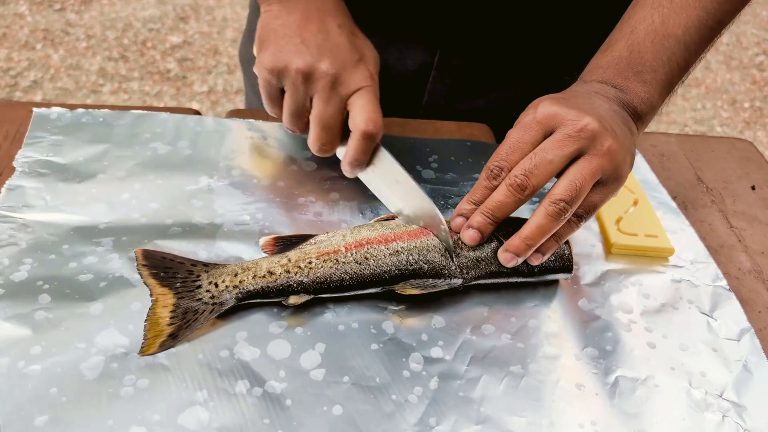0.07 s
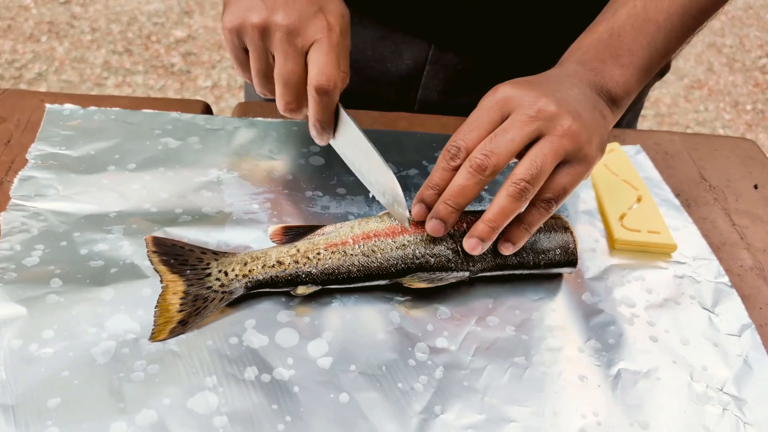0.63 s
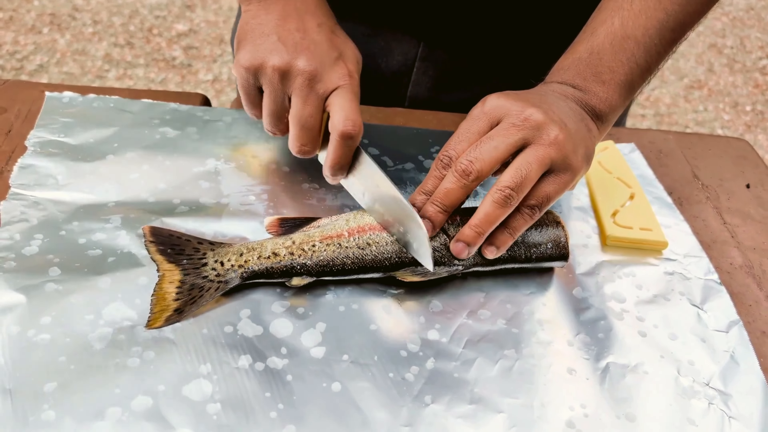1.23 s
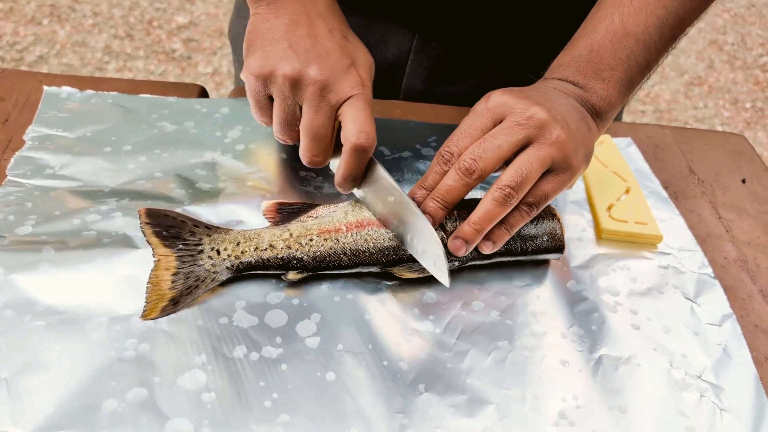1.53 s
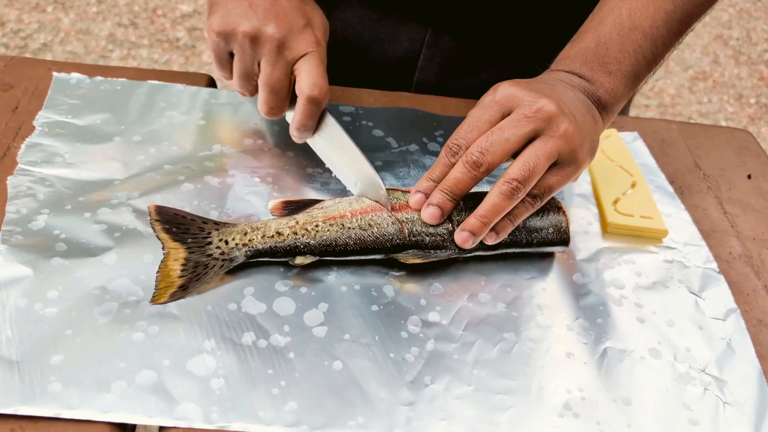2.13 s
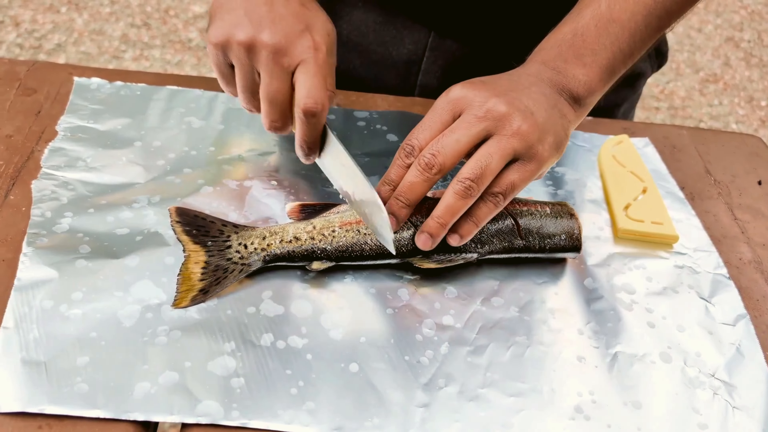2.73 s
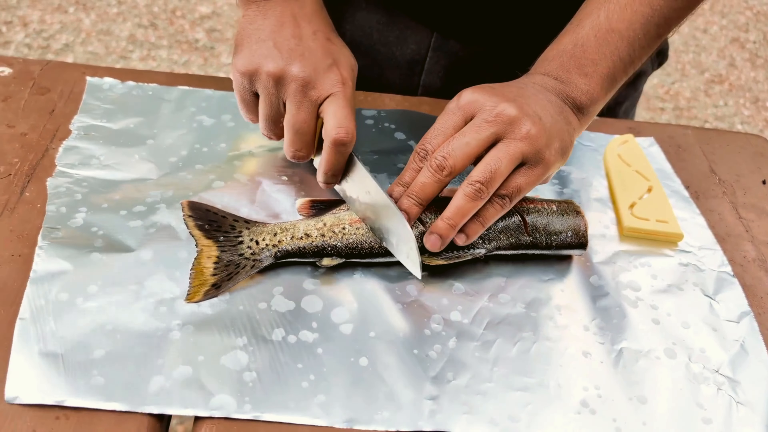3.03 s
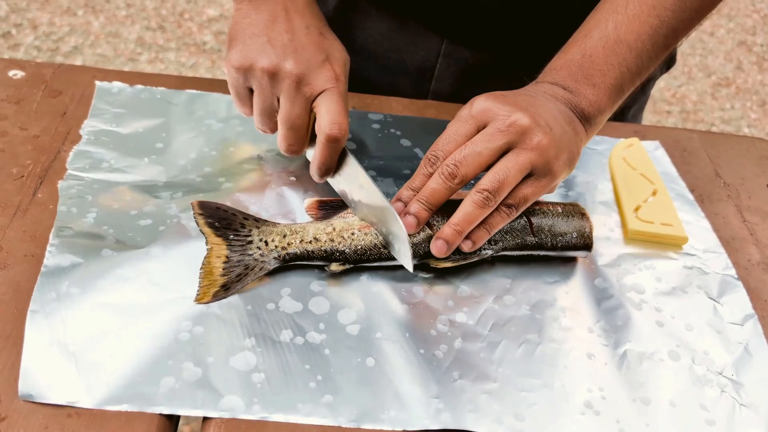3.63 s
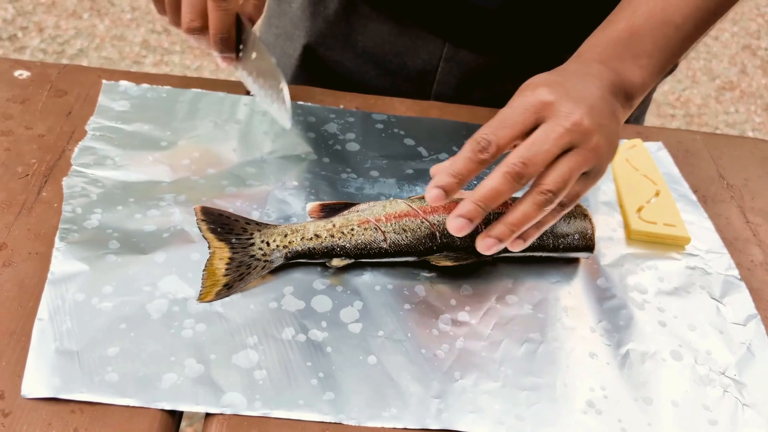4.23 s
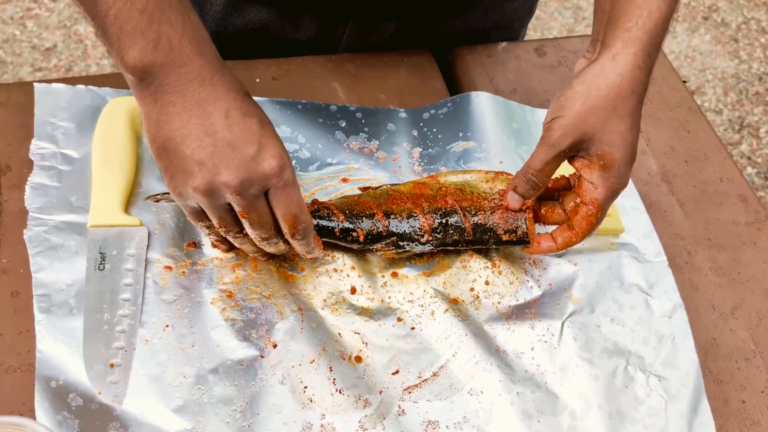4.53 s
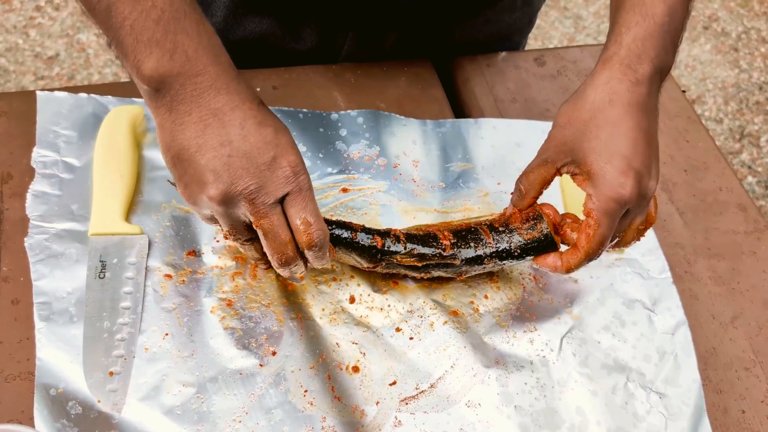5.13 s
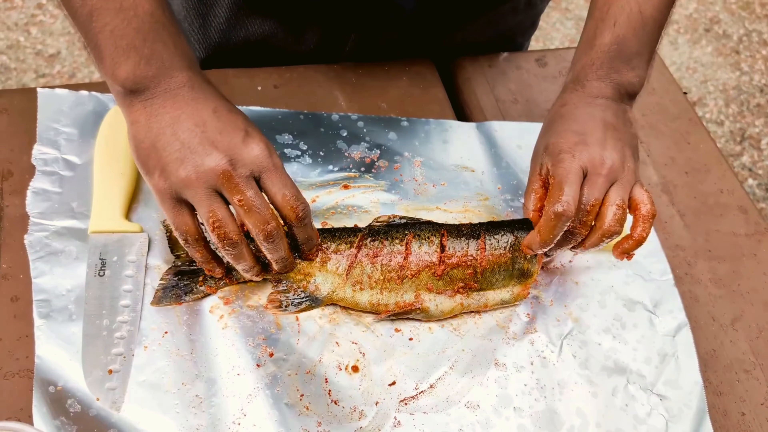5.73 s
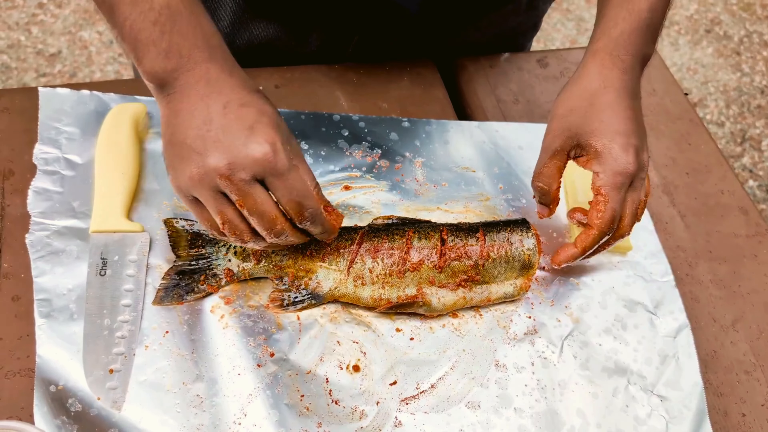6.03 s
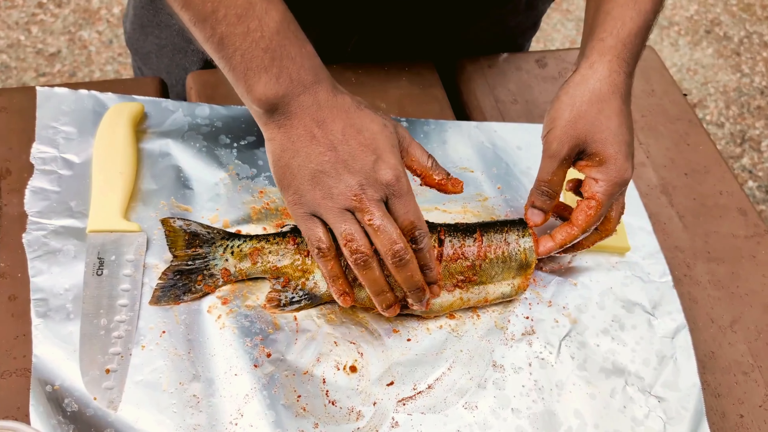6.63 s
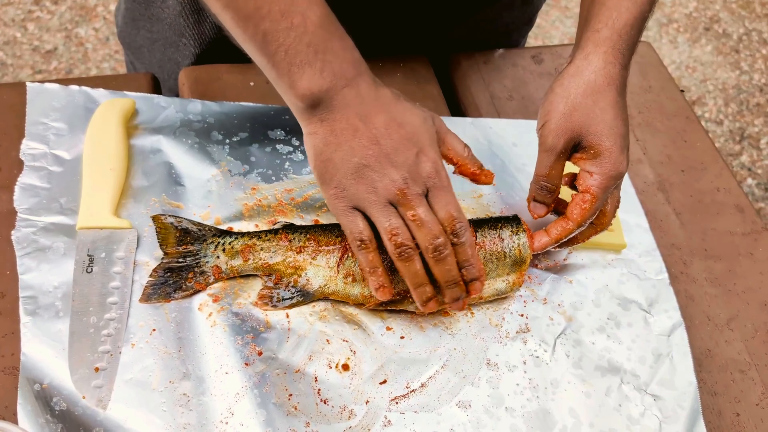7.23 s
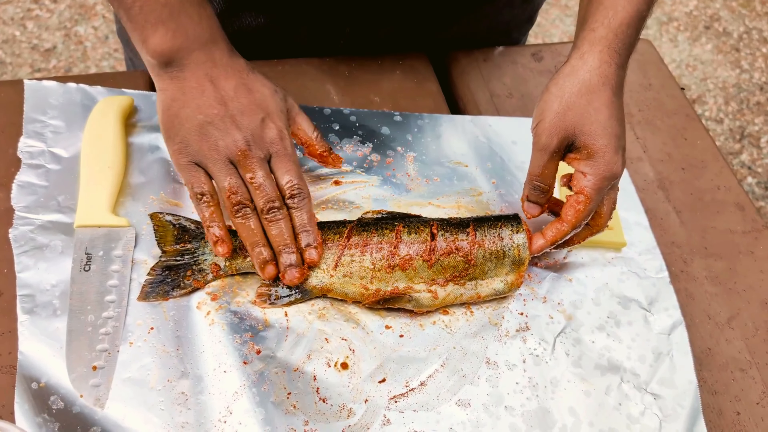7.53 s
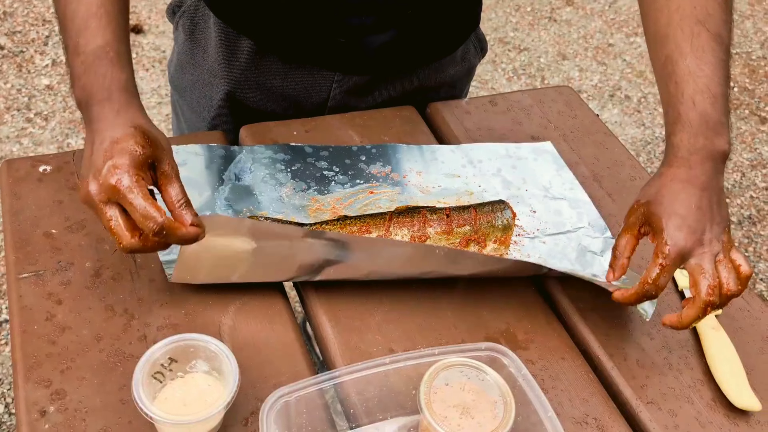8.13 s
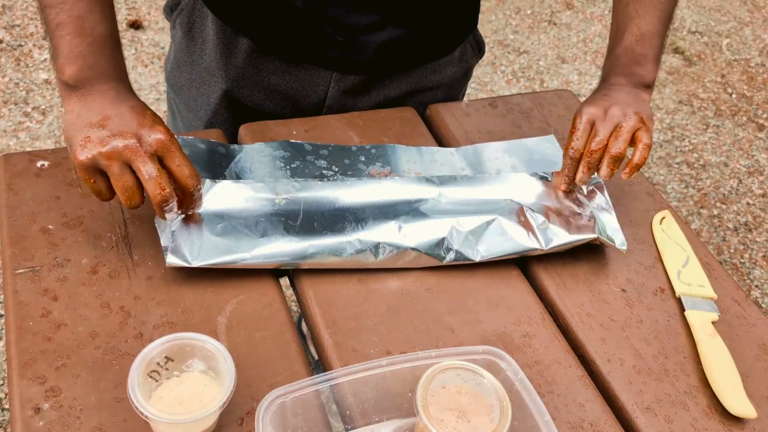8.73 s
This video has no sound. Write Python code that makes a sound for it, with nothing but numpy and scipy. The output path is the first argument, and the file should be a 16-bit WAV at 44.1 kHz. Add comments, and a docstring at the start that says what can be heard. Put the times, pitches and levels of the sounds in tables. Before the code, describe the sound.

In a forest clearing, distant birds chirp, buzz and trill with a light echo as burning wood crackles near the microphone. After one very loud pop from the fire, aluminium foil starts to crinkle and rustle close by, with a few soft knocks. The handling thins to scattered snaps, the fire pops sharply again, and the folding picks up, all over a soft low rumble of flames and breeze.

```python
"""In a forest clearing, aluminium foil is pressed and folded beside a campfire.
The foil crinkles as its facets buckle and ring, and larger creases snap through. Steam bursts
from the wood in pops, one very loud, and dry splinters tick over a low flutter of flames and
breeze; a few dull knocks sound. Distant songbirds whistle frequency-modulated buzzes, sweeps
and trills, which the trees scatter into reverberation."""
import sys
import numpy as np
from scipy import signal
from scipy.fft import rfft, irfft
from scipy.io import wavfile
from scipy.ndimage import uniform_filter1d, map_coordinates

SR = 44100
rng = np.random.default_rng(int(sys.argv[2]) if len(sys.argv) > 2 else 0)


def wav_out(sig):
    """Save sig, one row per channel (or a flat mono array), as 16-bit PCM at SR to the path in sys.argv[1]."""
    wavfile.write(sys.argv[1], SR, np.round(np.clip(np.atleast_2d(sig).T, -1, 1) * 32767).astype(np.int16))


N = 395577


def gain_of(db):
    """Amplitude ratio of a level in decibels."""
    return 10 ** (np.asarray(db) / 20)


def unit_rms(x):
    """Normalisation to unit mean power."""
    return x / np.sqrt(np.mean(x ** 2) + 1e-20)


def at_frequency(points, hz):
    """Interpolation on a logarithmic frequency axis."""
    point_hz, value = np.transpose(points)
    return np.interp(np.log(hz + 1), np.log(point_hz + 1), value)


def envelope(points):
    """Linear interpolation in time, one value a sample."""
    return np.interp(np.arange(N) / SR, *np.transpose(points))


def colour(x, spectrum):
    """Spectral shaping by a minimum-phase filter of unit energy."""
    log_gain = np.log(gain_of(at_frequency(spectrum, abs(np.fft.fftfreq(8192, 1 / SR)))))
    taps = np.fft.ifft(np.exp(np.conj(signal.hilbert(log_gain)))).real[:4096]
    return signal.oaconvolve(x, taps[None] / np.linalg.norm(taps), axes=1)[:, :x.shape[1]]


def resonate(x, hz, q):
    """Second-order resonance with unit gain at its peak."""
    return signal.lfilter(*signal.iirpeak(hz, q, fs=SR), x)


def noise_pair(size, coherence):
    """Partially coherent white noise in two channels."""
    a, b = rng.standard_normal((2, size))
    return np.array([a, coherence * a + np.sqrt(1 - coherence ** 2) * b])


def wander(size, per_s):
    """Smooth random modulation of rms about 1."""
    steps = np.arange(size) * per_s / SR
    return map_coordinates(rng.standard_normal(4096), [steps], order=3, mode="wrap")


def panned(side_db):
    """Channel gains for an interaural level difference, left minus right."""
    return gain_of([[side_db / 2], [-side_db / 2]])


def add(mix, start_s, sound):
    """Superposition of a sound on the mix."""
    part = mix[:, max(round(start_s * SR), 0):][:, :sound.shape[-1]]
    part += sound[..., :part.shape[1]]


def burst(decay_s, coherence, rise_s=0.00022):
    """Dense damped modes, modelled as exponentially decaying noise."""
    t = np.arange(SR // 8) / SR
    return .5 * noise_pair(len(t), coherence) * np.exp(-t / decay_s) * (1 - np.exp(-t / rise_s))


def flames_and_breeze():
    """Amplitude-modulated noise gives a low flutter and a flaring roar; steady noise, a faint hiss."""
    # likeness of the two channels: frequency_hz, coherence
    likeness = [(60, 0.65), (400, 0.92), (3000, 0.63), (10000, 0.98)]
    # low flutter of flames and breeze: time_s, level_db
    rumble_levels = [(0.0, -46), (0.82, -42), (.93, -36.5), (1.04, -42), (7.1, -42), (7.35, -37.5),
                     (7.5, -41.5), (8.97, -43)]
    # its spectrum: frequency_hz, relative_db
    rumble_spectrum = [(20, 1.5), (115, -0.5), (180, -7), (260, -16.5), (450, -26.5), (1500, -74)]
    # flames flaring up: time_s, level_db
    flare_levels = [(0, -102), (.9, -60), (2.05, -53), (2.3, -83), (2.9, -52.5), (3.6, -74.5), (7, -63)]
    # hiss of embers and forest: frequency_hz, relative_db
    hiss_spectrum = [(200, -1.5), (500, 2.5), (1000, -4), (2000, -12), (6300, -11), (7100, 0.5),
                     (8000, -11), (10500, 4), (11300, -24), (14000, -86)]
    coherence = at_frequency(likeness, np.fft.rfftfreq(N, 1 / SR))
    a, b = rfft(rng.standard_normal((2, N)))
    noise = irfft(np.array([a, coherence * a + np.sqrt(1 - coherence ** 2) * b]), N)
    rumble = unit_rms(colour(noise, rumble_spectrum))
    rumble *= gain_of(envelope(rumble_levels) + 2.56 * wander(N, 22))
    roar_band = signal.butter(2, [160, 400], "band", fs=SR, output="sos")
    roar = unit_rms(signal.sosfilt(roar_band, noise_pair(N, 0.86)))
    roar *= gain_of(envelope(flare_levels) + 2.5 * wander(N, 30))
    hiss = unit_rms(colour(noise[:, ::-1], hiss_spectrum)) * gain_of(-58)
    return rumble + roar + hiss


def forest(x, t60_s, early_db):
    """Reverberation: early reflections from the ground and near trunks, then a scattered tail."""
    t = np.arange(SR) / SR
    echoes = rng.choice([-1., 1.], (2, SR)) * (rng.random((2, SR)) < 2000 / SR) * (t > .003)
    echoes *= gain_of(-60 * t / t60_s) + gain_of(early_db) * np.exp(-t / 0.015)
    return signal.oaconvolve(x, echoes / np.linalg.norm(echoes[0]), axes=1)[:, :N]


def syllable(name, pitch_ratio, flutter_hz=115, waver_hz=38, accent_db=3):
    """Frequency modulation: an unevenly accented whistle glides, wavers and may flutter fast."""
    # whistle contours by syllable: time_s, pitch_hz, level_db
    contours = { "rise": [(0, 4480, -20), (.028, 4500, -2), (.044, 4700, -4), (.076, 6000, -2)],
                "seep": [(0, 6840, -3), (.085, 6640, -6)], "flick": [(0, 5600, -6), (.012, 4750, 0),
                (.03, 4150, -3)], "drop": [(0, 6050, -7), (.009, 5500, 3), (.024, 4650, -3),
                (.04, 3950, -6), (.06, 3850, -10)], "sweep": [(0, 4800, -22), (.016, 5200, -12.5),
                (.036, 6500, -18), (.066, 7250, -1), (.1, 7500, 2), (.135, 7420, -14)],
                "high": [(0, 4870, 9.5), (.02, 5600, 0.5), (.045, 7600, 0), (.085, 8450, 7),
                (.12, 7890, -1)], "buzz": [(0, 6360, -4), (.035, 6820, 2.5), (.055, 6650, 14.5),
                (.1, 6240, -21)], "slur": [(0, 5856, 0.5), (.09, 5410, -8.5), (.125, 5290, -38)],
                "thin": [(0, 7220, 3.5), (.12, 7170, 16), (.17, 7216, -3)], "chip": [(0, 5100, 3),
                (.022, 4650, -5)], "carol": [(0, 3035, 5.5), (.05, 2688, -0.5)], "warble": [(0, 2500, -12),
                (.028, 2850, -4), (.046, 2400, 2), (.055, 2850, -7), (.07, 2480, 1), (.082, 2480, 3),
                (.106, 2030, -1)]}
    # fast pitch swing by syllable: deviation_hz
    flutter_depths = {"buzz": 260, "sweep": 150, "high": 210, "carol": 130}
    time_s, hz, db = np.transpose(contours[name])
    t = np.arange(0, time_s[-1], 1 / SR)
    detuning = 1 + .003 * rng.standard_normal()
    pitch = pitch_ratio * detuning * np.interp(t, time_s, hz) + waver_hz * wander(len(t), 293)
    pitch += flutter_depths.get(name, 0) * np.sin(2 * np.pi * flutter_hz * t)
    accents = unit_rms(gain_of(accent_db * wander(len(t), 130)))
    amplitude = gain_of(np.interp(t, time_s, db)) * accents * signal.windows.tukey(len(t), .15)
    return np.sqrt(2) * np.sin(2 * np.pi * np.cumsum(pitch) / SR) * amplitude


def birds():
    """Notes and trills take two paths: direct to the ears, and out to the trees that scatter them."""
    # single notes: start_s, syllable, pitch_ratio, level_db, side_db
    single_notes = [(0.417, "rise", 1, -46, 0), (0.619, "rise", .995, -36, -0.5),
                    (3.112, "sweep", 1.02, -33, 1), (5.245, "carol", 0.77, -43.5, 2),
                    (7.818, "warble", 1, -36.5, 8), (7.935, "carol", 1.27, -51, -7),
                    (8.175, "thin", 1.165, -57, 10), (8.254, "carol", 0.96, -48, 14),
                    (8.442, "carol", 0.9, -45.5, 6.5), (0.826, "seep", 1, -38, 4),
                    (2.075, "flick", 1.02, -48, -2.5), (2.336, "buzz", 1.005, -39.5, 2.5),
                    (3.31, "slur", 0.985, -27, -3), (4.081, "thin", 1, -55.5, -8),
                    (4.658, "carol", 0.95, -43, 4), (7.04, "slur", 1.025, -30.5, -4),
                    (7.635, "thin", 1.005, -53, -3), (7.668, "carol", 0.98, -47.5, 14.5)]
    # repeated notes: first_s, last_s, interval_s, syllable, pitch_ratio, first_db, last_db, side_db
    trills = [(0.936, 1.774, .1197, "drop", 1.015, -44.5, -39.5, -5),
              (2.458, 2.885, .214, "sweep", 1, -30.5, -31.5, 1),
              (3.446, 3.958, .0637, "flick", 1.01, -51, -53.5, -3.5),
              (4.461, 4.974, .129, "chip", .99, -32, -34, -2.5),
              (6.158, 6.827, .224, "high", 1, -49.5, -50, -1)]
    # sound reaching the trees, by syllable: relative_db
    echo_levels = {"chip": -6, "high": 5, "flick": 6, "sweep": 2, "drop": 2, "carol": 3}
    direct, scattered = np.zeros((2, 2, N))
    notes = list(single_notes)
    for first_s, last_s, interval_s, name, pitch_ratio, first_db, last_db, side_db in trills:
        count = round((last_s - first_s) / interval_s) + 1
        for start_s, db in np.linspace((first_s, first_db), (last_s, last_db), count):
            notes.append((start_s, name, pitch_ratio, db, side_db))
    for start_s, name, pitch_ratio, db, side_db in notes:
        sound = gain_of(db) * panned(side_db) * syllable(name, pitch_ratio)
        lag = round(-3 * np.tanh(side_db / 2))  # the far ear hears the bird a few samples later
        add(direct, start_s, np.array([np.roll(sound[0], lag), sound[1]]))
        add(scattered, start_s, gain_of(echo_levels.get(name, 0)) * sound)
    return direct, scattered


def knocks():
    """Impulsive excitation: a scuff of noise drives a broad, steep-sided resonance."""
    # soft hollow knocks: start_s, ring_hz, peak_db
    taps = [(5.086, 1050, -24), (5.087, 2200, -22), (5.915, 260, -35), (5.99, 2000, -32),
            (6.919, 1700, -33), (6.94, 600, -36), (6.981, 1700, -36), (7.492, 450, -34)]
    out = np.zeros((2, N))
    for start_s, hz, db in taps:
        ring = resonate(resonate(burst(.005, coherence=.9), hz, q=2), hz, q=2)
        add(out, start_s, gain_of(db) * ring / abs(ring).max())
    return out


def burning_wood(puff_s=0.00028, faint_ticks_per_s=42):
    """Sudden pressure release: steam pockets burst with a puff and a crack; splinters tick between."""
    # bursting steam pockets: start_s, crack_db, decay_s, puff_db
    pops = [(0.0732, -13, 0.0016, -25.5), (0.264, -30, 0.0038, -15), (2.311, -24, 0.001, -29),
            (4.2595, 4.5, 0.0016, 6), (4.2613, 4.5, 0.0025, -20), (5.946, -14, 0.0026, -22),
            (7.035, -5.5, 0.00087, -33), (7.782, -3.5, 0.002, -1)]
    # dry splinters, without a puff: start_s, level_db, ring_hz
    ticks = [(.198, -25.5, 2020), (0.401, -23.5, 3530), (.708, -29.5, 2500), (.905, -11, 6050),
             (1.191, -33, 3000), (1.294, -21, 8200), (1.417, -26, 8000), (1.514, -31, 3000),
             (1.665, -25, 2450), (2.424, -19.5, 6100), (2.654, -27.5, 3060), (2.779, -21, 6200),
             (2.988, -19, 4040), (3.092, -19.5, 7000), (3.554, -23, 3000), (3.736, -32, 2500),
             (3.801, -18.5, 4140), (6.938, -20.5, 4960), (7.232, -26.5, 1960), (7.877, -7, 5900)]
    # splintering wood: frequency_hz, relative_db
    crack_spectrum = [(60, 23.5), (150, 14), (500, 8.5), (780, 5), (1050, 5.5), (2200, 6), (3200, 2.5),
                      (6000, 3.5), (10500, 5.5), (11300, -23), (14000, -114)]
    cracks, puffs = np.zeros((2, 2, N))
    u = np.arange(SR // 50) / SR / puff_s
    blast_wave = (1 - u) * np.exp(-u)  # compression, then rarefaction
    for start_s, crack_db, decay_s, puff_db in pops:
        # the weaker the puff, the thinner the splinter and the brighter its crack
        highpass = signal.butter(1, 130 * gain_of(-.5 * puff_db), "high", fs=SR)
        crack = signal.lfilter(*highpass, burst(decay_s, coherence=0.84, rise_s=0.000082))
        add(cracks, start_s, gain_of(crack_db) * crack)
        add(puffs, start_s, gain_of(puff_db) * blast_wave)
    for start_s, db, hz in ticks:
        add(cracks, start_s, gain_of(db) * resonate(burst(0.0018, coherence=0.78), hz, q=1))
    faint_db = -48 + 5 * np.minimum(rng.exponential(1, N), 2.8)
    impulses = gain_of(faint_db) * (rng.random(N) < faint_ticks_per_s / SR)
    cracks += signal.oaconvolve(impulses[None], burst(0.0012, coherence=0.43), axes=1)[:, :N]
    puffs = signal.sosfilt(signal.butter(6, 7000, fs=SR, output="sos"), puffs)
    return colour(cracks, crack_spectrum) + puffs


def press(start_s, length_s, attack_s=0.018, release_s=0.03):
    """Loading and relaxation: a finger's force builds, holds and dies away exponentially."""
    t = np.arange(N) / SR - start_s
    return np.clip(t / attack_s, 0, 1) * np.exp(-np.clip((t - length_s) / release_s, 0, 20))


def buckling(drive, onset_s, per_s, spread_db, decay_s, coherence, ring_db, band_hz, facets=24):
    """Facets buckle as a Poisson process, denser under force; each rings at its own frequency."""
    busy_db, least_share = -49, 0.25  # below this drive fewer facets buckle, down to this share
    t, out = np.arange(SR // 25) / SR, np.zeros((2, N))
    for hz in np.geomspace(*band_hz, facets):
        phase = rng.random((2, 1)) * (1 - coherence)
        ring = np.sin(2 * np.pi * (hz * t + phase)) * np.exp(-t / (2 * decay_s))
        click = burst(decay_s, coherence, rise_s=.0001)[:, :len(t)] + gain_of(ring_db) * ring
        click = unit_rms(click) / np.sqrt(t[-1] * per_s)
        gaps, sizes = rng.exponential(1, (2, 1024))
        times = onset_s + np.cumsum(gaps) * facets / per_s
        # the strain moves from facet to facet, so the colour keeps shifting
        strain_db = 3 * np.interp(times * 14, np.arange(256), rng.standard_normal(256))
        drive_now = drive[np.minimum((times * SR).astype(int), N - 1)]
        share = np.clip(drive_now / gain_of(busy_db), least_share, 1)
        strengths = unit_rms(gain_of(spread_db * np.minimum(sizes, 3.4) + strain_db))
        gains = strengths * drive_now / np.sqrt(share)
        buckles = (rng.random(len(times)) < share) & (times < N / SR)
        for start_s, gain in zip(times[buckles], gains[buckles]):
            add(out, start_s, gain * click)
    return out


def flexing(x, depth_db=3):
    """Bending shifts the sheet's resonances, so patches of the spectrum swell and sink."""
    spectra = signal.stft(x)[2]
    patches = uniform_filter1d(rng.standard_normal(spectra.shape[1:]), size=4, axis=0)
    patches = uniform_filter1d(patches, size=11)
    gains = unit_rms(gain_of(depth_db * unit_rms(patches)))
    return signal.istft(spectra * gains)[1][:, :N]


def foil(loose_crinkle_db=-9):
    """Elastic instability: pressing sets off fine crinkle and broader rustle; creases snap through."""
    # movement of the whole sheet: time_s, rustle_db
    handling = [(4.3, -45), (5.33, -46.5), (5.5, -70.5), (5.7, -42.5), (5.95, -52), (6.08, -65),
                (6.45, -56.5), (7.35, -57), (7.9, -50), (8.97, -42.5)]
    # fingers pressing in: start_s, length_s, crinkle_db, rustle_db
    presses = [(4.446, 0.14, -40, -47.5), (4.629, 0.031, -35, -43.5), (4.778, 0.027, -34.5, -43),
               (4.897, 0.014, -31.5, -49), (5.078, 0.023, -38.5, -40), (5.236, 0.062, -39, -43),
               (5.577, 0.077, -34, -41.5), (5.713, 0.039, -38, -48), (5.789, 0.18, -46, -47),
               (6.763, 0.046, -48.5, -50), (7.993, 0.14, -42.5, -47.5), (8.147, 0.12, -40.5, -47),
               (8.398, 0.037, -40, -47), (8.468, 0.079, -37.5, -44), (8.731, 0.094, -34.5, -38),
               (8.869, 0.042, -44, -33)]
    # single large creases: start_s, level_db, decay_s, ring_hz
    creases = [(4.995, -21, .004, 5000), (5.06, -25, 0.0026, 7000), (5.159, -24, 0.008, 7800),
               (5.328, -24.5, 0.0059, 4500), (5.564, -28, 0.0076, 12000), (5.598, -17.5, 0.036, 6460),
               (5.92, -24.5, 0.0041, 14000), (6.207, -20.5, 0.0066, 12000), (6.422, -10.5, 0.0067, 8600),
               (6.806, -17.5, 0.0051, 13400), (7.169, -30.5, 0.0036, 10900), (7.562, -13.5, 0.0021, 7600),
               (7.806, -11, .0079, 7500), (8.157, -26, .05, 8600), (8.312, -27, 0.017, 7400),
               (8.416, -18.5, 0.0075, 10000), (8.489, -19.5, 0.011, 9400), (8.599, -25.5, 0.012, 7000),
               (8.683, -23, 0.012, 4900), (8.746, -11.5, 0.0025, 10700), (8.795, -21.5, 0.028, 13500),
               (8.832, -11, .0022, 10000), (8.869, -20, .008, 11000), (8.894, -16, .017, 11800),
               (8.946, -14, 0.003, 9000)]
    # fine crinkle: frequency_hz, relative_db
    crinkle_spectrum = [(200, -33), (2500, -8), (4500, -5), (7000, -4), (10000, -3.5), (13000, -8),
                        (16000, -11)]
    # broader rustle: frequency_hz, relative_db
    rustle_spectrum = [(100, -17), (300, 2.5), (600, -2.5), (1400, -1), (2300, 5), (3500, 1), (6000, 5),
                       (10000, -4), (13000, -61)]
    sheet_db, onset_s = envelope(handling), handling[0][0]
    crinkle_power = gain_of(sheet_db + loose_crinkle_db) ** 2
    rustle_power = gain_of(sheet_db) ** 2
    for start_s, length_s, crinkle_db, rustle_db in presses:  # incoherent sources add in power
        force = press(start_s, length_s)
        crinkle_power += (gain_of(crinkle_db) * force) ** 2
        rustle_power += (gain_of(rustle_db) * force) ** 2
    crinkle = buckling(np.sqrt(crinkle_power), onset_s, per_s=1500, spread_db=3.5, decay_s=.0016,
                       coherence=.55, ring_db=-17, band_hz=(3000, 13000))
    rustle = buckling(np.sqrt(rustle_power), onset_s, per_s=2000, spread_db=2.8, decay_s=.003,
                      coherence=.4, ring_db=-14, band_hz=(750, 5000))
    for start_s, db, decay_s, hz in creases:
        snap = burst(decay_s, coherence=0.26, rise_s=0.0012)
        add(crinkle, start_s, gain_of(db) * (.5 * snap + resonate(snap, hz, q=2)))
    sheet = colour(crinkle, crinkle_spectrum) + colour(rustle, rustle_spectrum)
    return panned(side_db=0.5) * flexing(sheet)


def scene():
    """The direct-to-reverberant ratio sets distance: foil and fire near by, birds far off."""
    near = foil() + burning_wood() + knocks()
    reflections = gain_of(-15) * forest(near, t60_s=0.11, early_db=7)
    tail = gain_of(-23.5) * forest(near, t60_s=0.3, early_db=-14)
    direct, scattered = birds()
    song = gain_of(-3) * direct + gain_of(-3.5) * forest(scattered, t60_s=.62, early_db=1)
    return near + reflections + tail + song + flames_and_breeze()


def record(dry, cutoff_hz=16200):
    """Hard clipping flattens the loudest pop; a low-pass filter then limits the band."""
    lowpass = signal.firwin(511, cutoff_hz, window=("kaiser", 9), fs=SR)
    return signal.oaconvolve(np.clip(dry, -1, 1), lowpass[None], "same")


dry = scene()
out = record(dry)
wav_out(out)
```